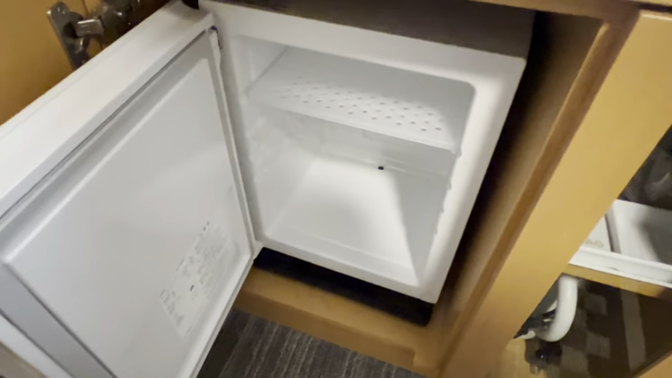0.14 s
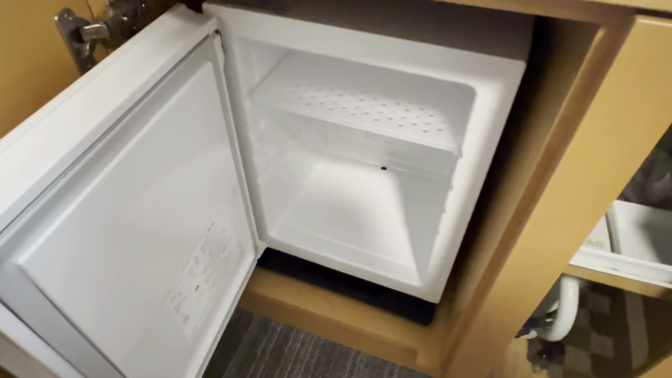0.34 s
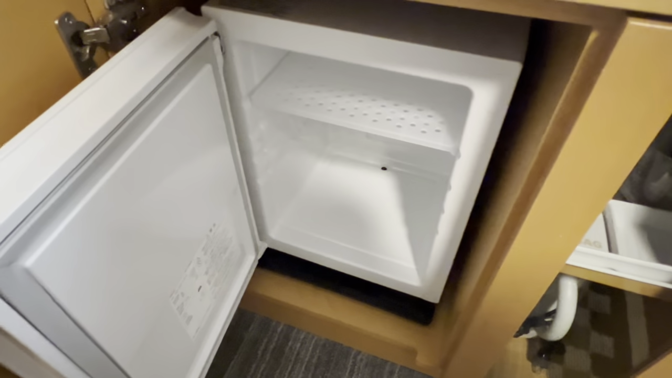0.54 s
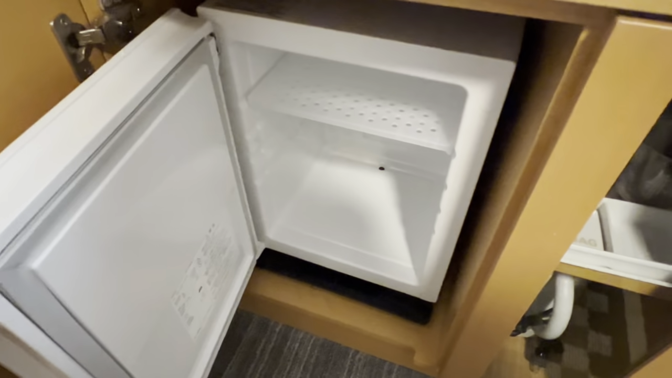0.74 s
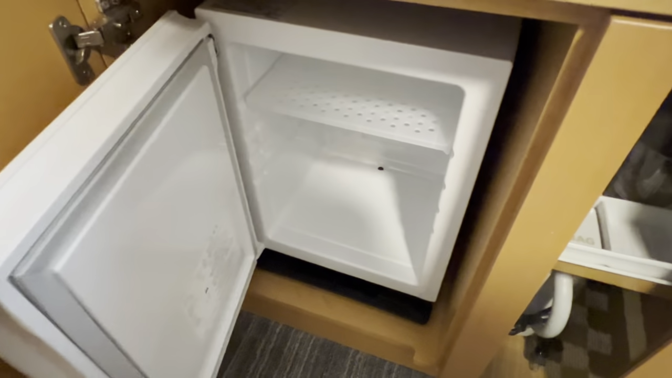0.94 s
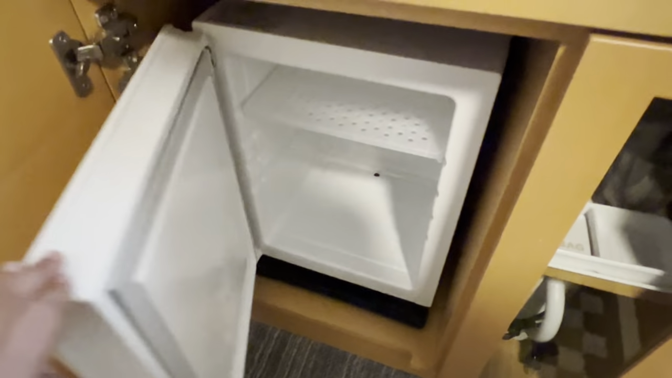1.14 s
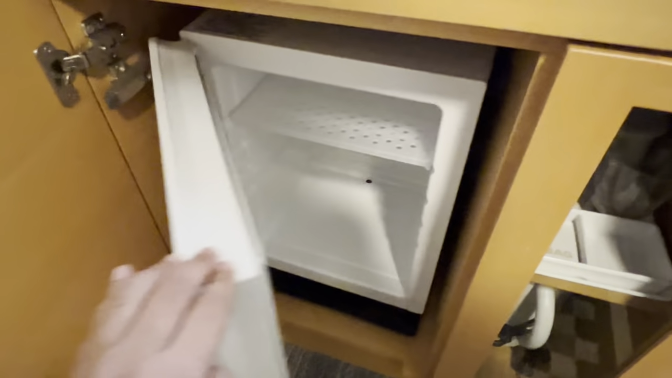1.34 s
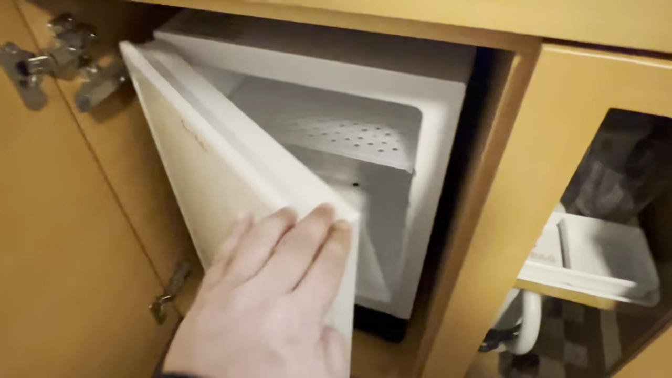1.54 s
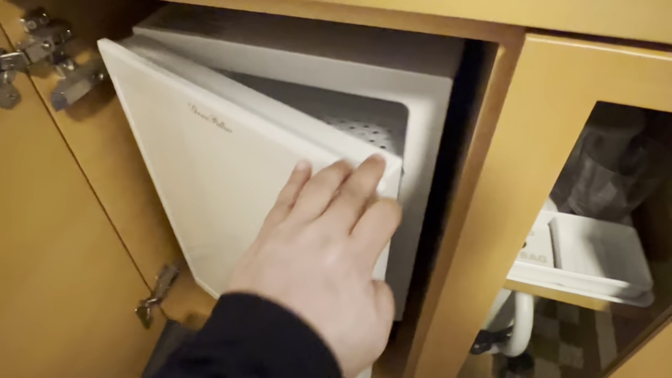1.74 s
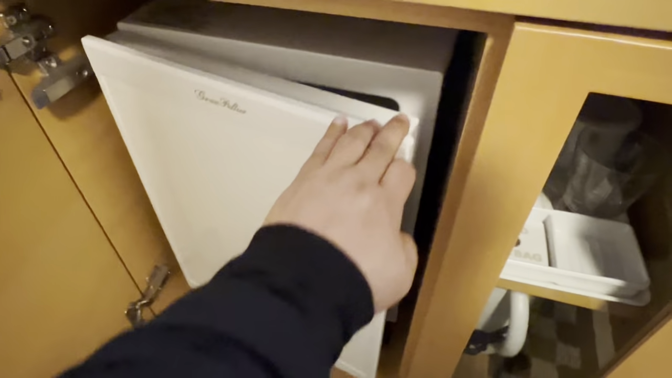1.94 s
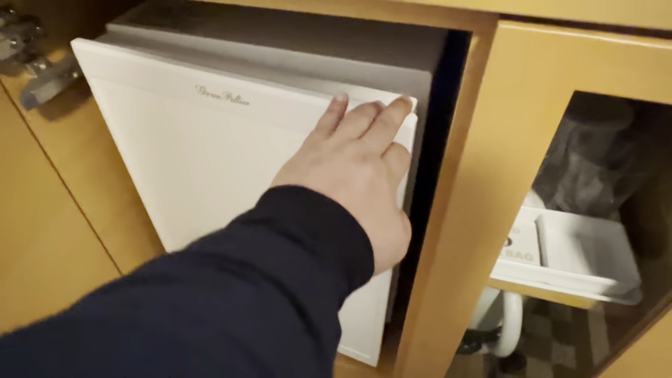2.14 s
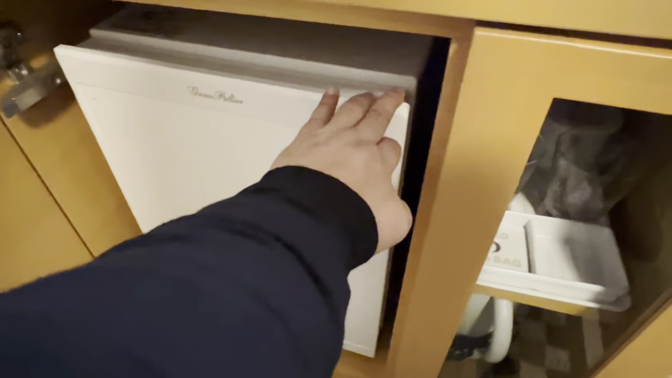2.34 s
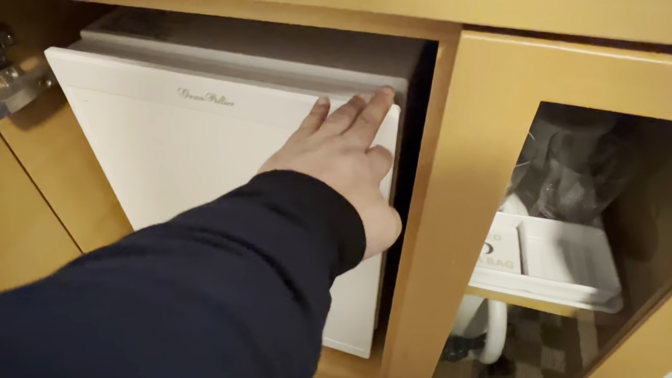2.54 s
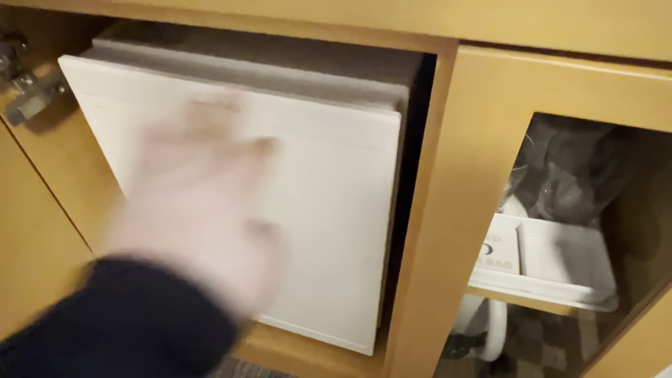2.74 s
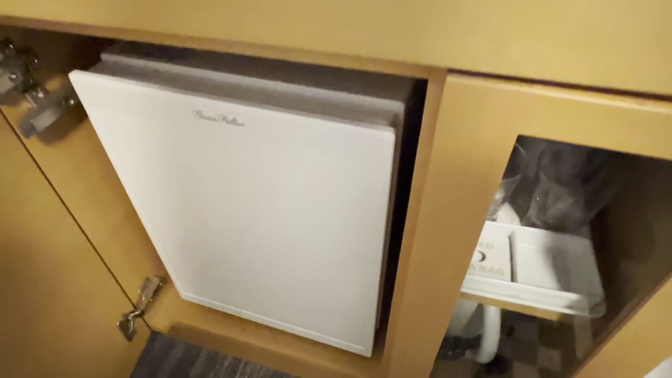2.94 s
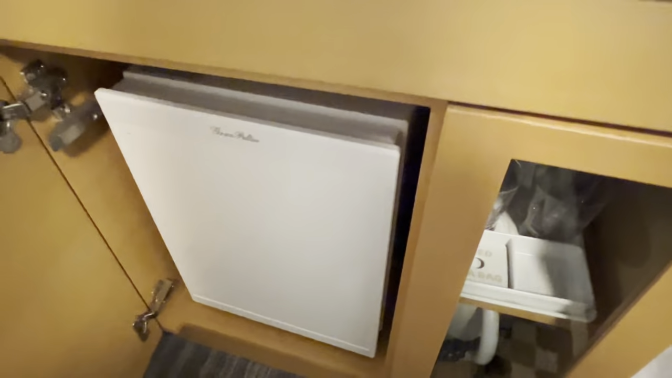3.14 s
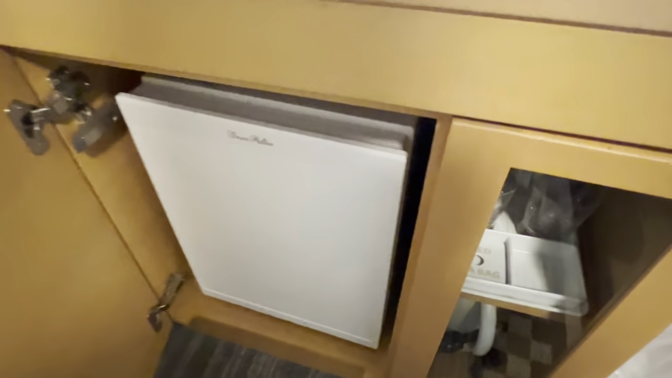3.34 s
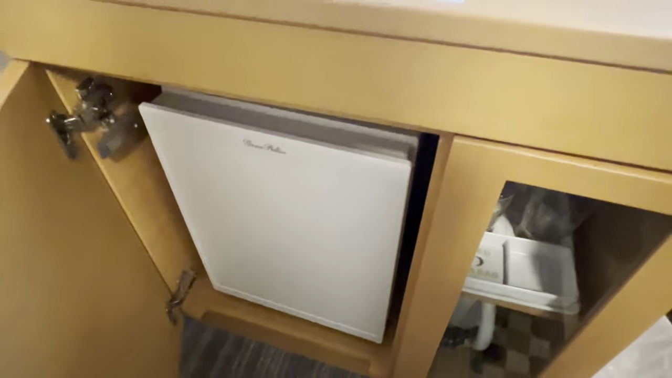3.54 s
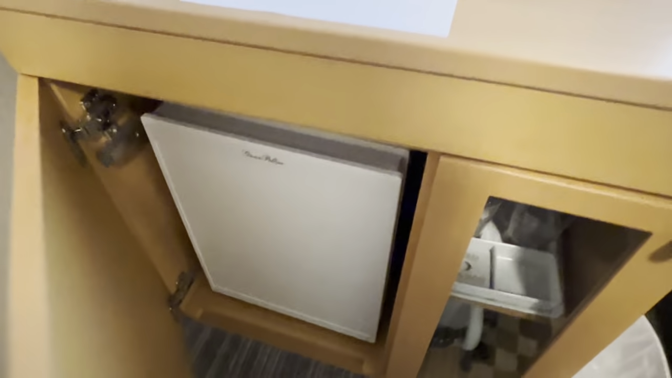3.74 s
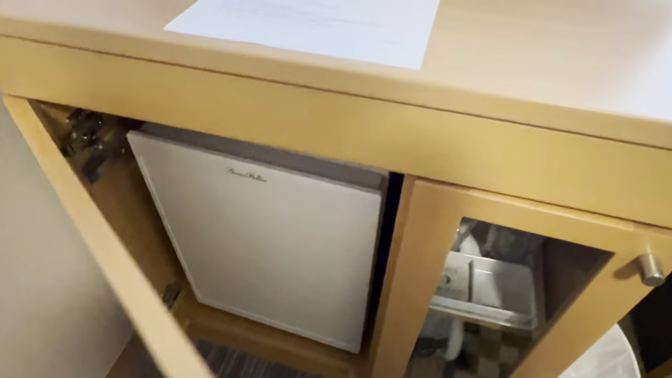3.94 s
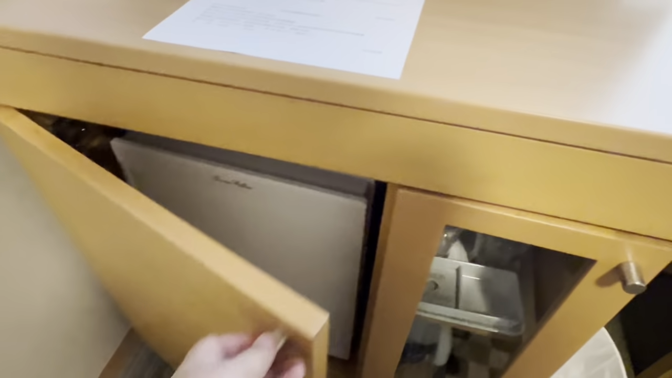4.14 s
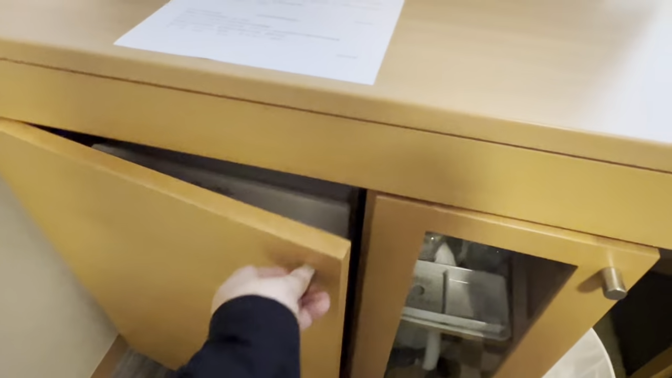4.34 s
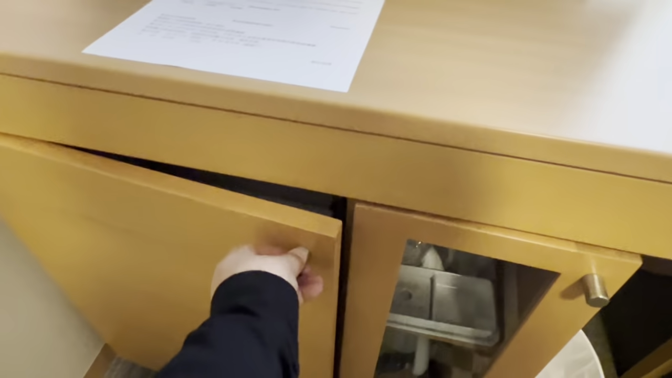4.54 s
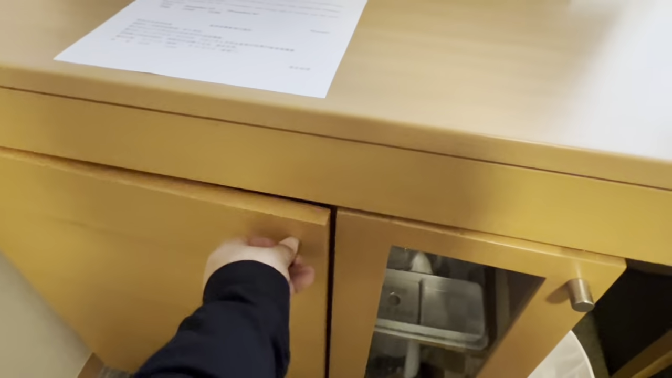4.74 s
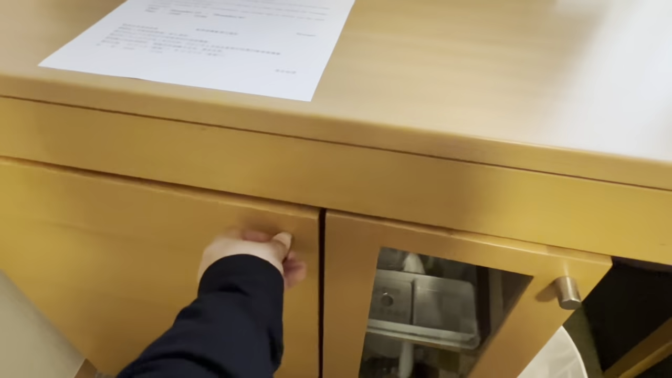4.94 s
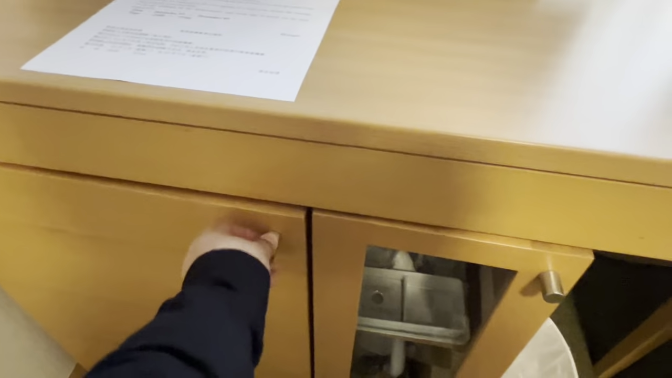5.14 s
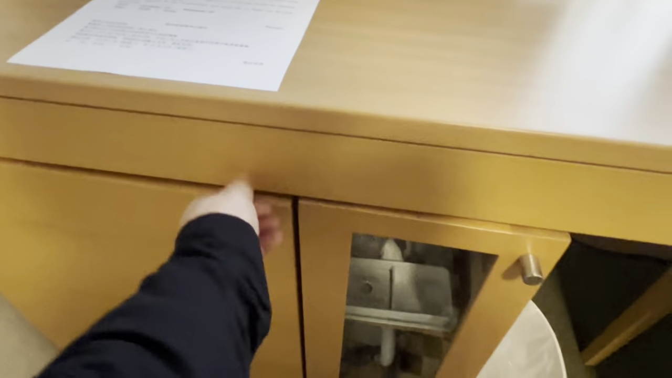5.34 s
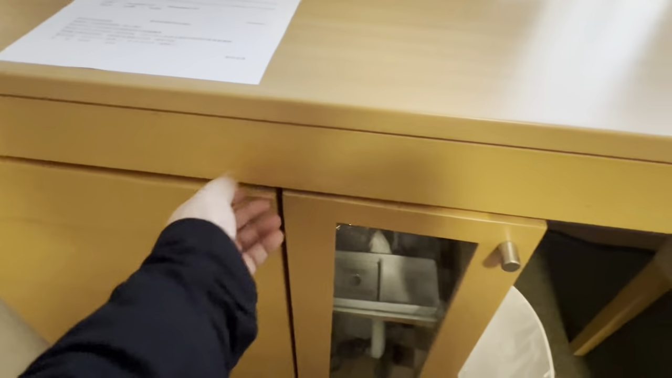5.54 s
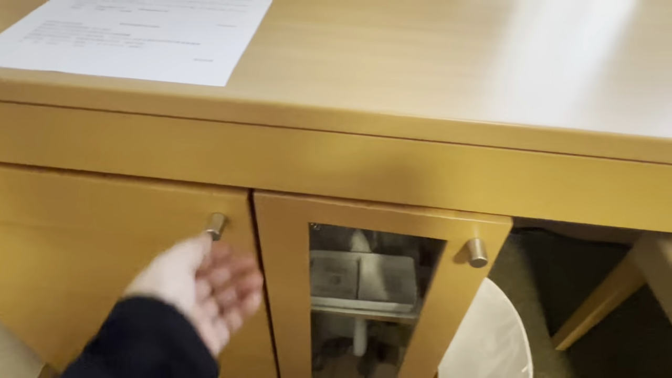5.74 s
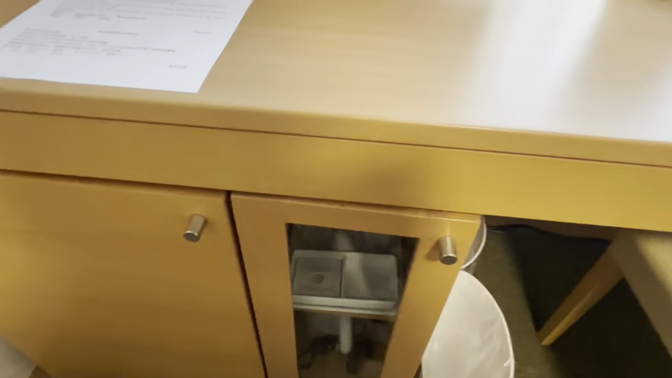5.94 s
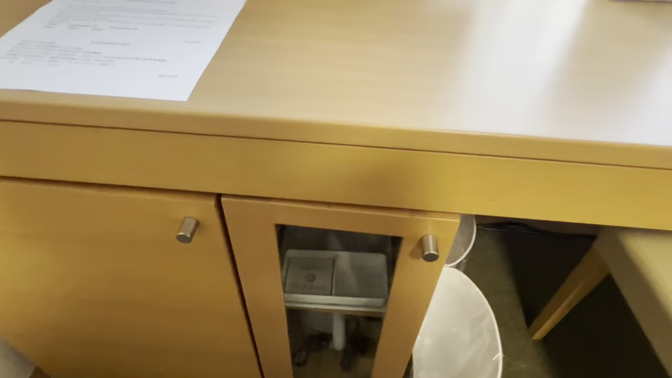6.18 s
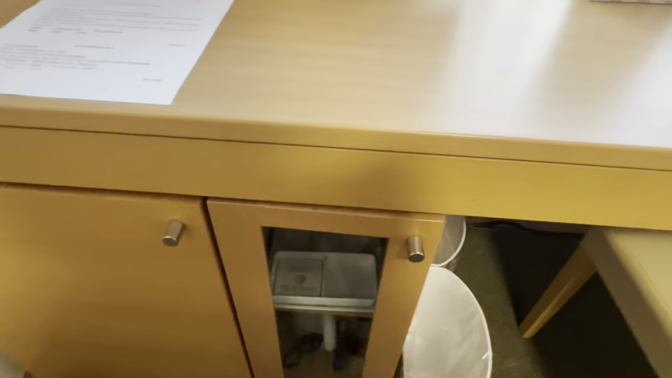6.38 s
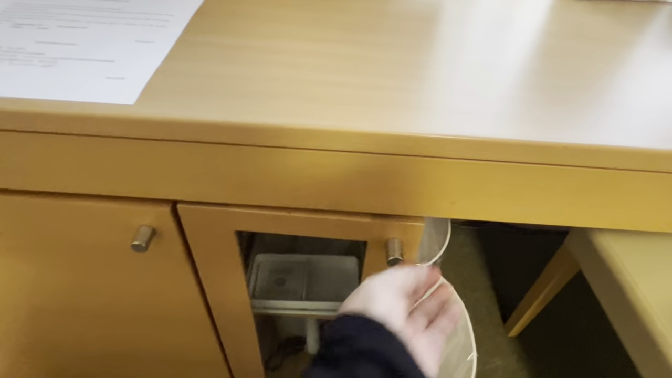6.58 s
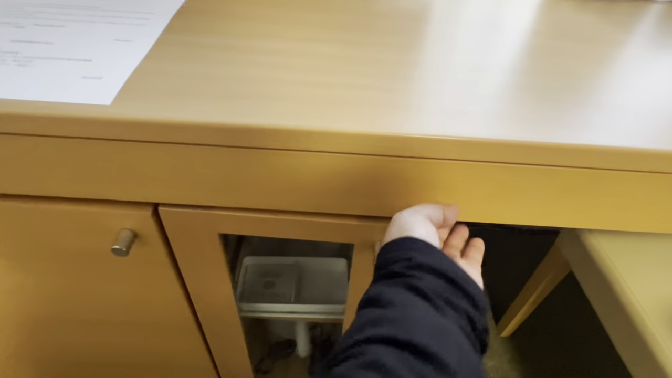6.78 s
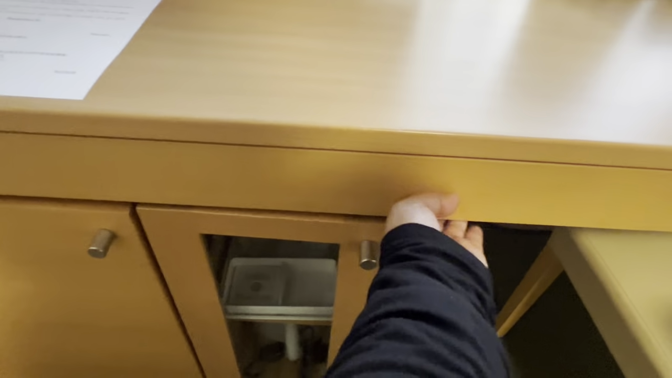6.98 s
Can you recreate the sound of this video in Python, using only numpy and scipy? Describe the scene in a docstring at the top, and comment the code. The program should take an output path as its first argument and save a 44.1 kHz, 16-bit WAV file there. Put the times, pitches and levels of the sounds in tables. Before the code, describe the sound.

Faint ventilation rumbles steadily in a small room. At about 2.3 seconds a small fridge door shuts close by with a slap of its rubber seal and a loud, low thud, followed by a tiny plastic tick at 2.7. A hand knocks lightly on a wooden cabinet door at 3.1, and a jacket sleeve rustles softly until just past 4 seconds. The hinges give brief, quiet squeaks and clicks around 3.6 to 4. Another light, hollow knock comes at 4.2, then the hinge spring snaps with a small metallic ring at 4.4. At about 4.9 the door claps shut against its frame, sharp and loud, with a short wooden boom. Faint scuffs follow around 5.3, with a little more sleeve rustle. At 6.7 a hand bumps the next door with a soft, dull thump, and the hum continues to the end at about 7 seconds.

```python
"""Shutting a fridge and its cabinet

A small fridge inside a wooden cabinet is pushed shut: its rubber seal slaps and the box booms.
The cabinet door swings round on squeaky sprung hinges and claps against the frame, so the wood rings;
a hand then bumps the next door. A jacket sleeve rustles close by as its folds rub together,
and ventilation hums in the small carpeted room."""
import sys
import numpy as np
from scipy import signal
from scipy.fft import rfft, irfft, next_fast_len
from scipy.io import wavfile

SR = 44100
rng = np.random.default_rng(int(sys.argv[2]) if len(sys.argv) > 2 else 0)


def store_wav(level_fs):
    """Save 16-bit WAV to argv[1]."""
    pcm = np.round(np.clip(np.atleast_2d(level_fs), -1, 1) * 32767)
    wavfile.write(sys.argv[1], SR, pcm.T.astype(np.int16))


N = 309141
TIME = np.arange(N) / SR
RING_TIME = TIME[:SR]  # one second for a struck thing to ring out

# how long sounds ring in the room, until 60 dB quieter: (frequency [Hz], ring time [s])
ROOM_DECAY = [(100, 0.69), (300, 0.25), (1000, 0.25), (5000, .27), (9000, 0.31), (15000, 0.19)]


def from_db(db):
    """Turn decibels into a number to multiply by."""
    return 10 ** (np.asarray(db) / 20)


def rms_one(x):
    """Scale a signal so that its average size (rms) is 1."""
    return x / np.sqrt(np.mean(x ** 2) + 1e-20)


def at_hz(points, hz):
    """Look up a frequency in a table, with octaves evenly spaced."""
    f, value = np.transpose(points)
    return np.interp(np.log(hz + 0.0011), np.log(f), value)


def drift(rate):
    """A random wobble of size 1 that heads for a new value `rate` times a second."""
    knots = rng.standard_normal(int(N / SR * rate) + 2)
    return rms_one(np.interp(TIME * rate, np.arange(len(knots)), knots))


def stereo_spectrum(colour, likeness, size, uneven_db, spacing_hz):
    """Left and right noise spectra shaped by `colour`; resonances and echoes make them uneven."""
    hz = np.fft.rfftfreq(size, 1 / SR)
    mid, side = rfft(rng.standard_normal((2, size)))
    heights = rng.standard_normal(4096)
    ripple_db = uneven_db * np.interp(hz / spacing_hz, np.arange(len(heights)), heights) * hz / (hz + 500)
    alike = np.clip(at_hz(likeness, hz), -.98, .98)
    bass_cut = 1 / np.sqrt(1 + (colour[0][0] / (hz + 1)) ** 6)
    gain = bass_cut * from_db(at_hz(colour, hz) + ripple_db)
    return hz, gain * (np.sqrt(1 + alike) * mid + np.sqrt(1 - alike) * side * [[1], [-1]])


def noise(colour, uneven_db, spacing_hz, size, lag=0):
    """Steady stereo noise of rms 1; the right side hears it `lag` seconds later."""
    # how alike air and rustle are on the left and right: (frequency [Hz], likeness [-1..1])
    likeness = [(60, 0.29), (130, 0.1), (290, 0.4), (700, 0.27), (3000, 0.011)]
    padded_size = 2 * next_fast_len(size // 2 + 1)
    hz, spectrum = stereo_spectrum(colour, likeness, padded_size, uneven_db, spacing_hz)
    delay = np.exp(-2j * np.pi * hz * np.array([[0], [lag]]))
    return rms_one(irfft(spectrum * delay)[:, :size])


def die_away(t, ring_s):
    """A fade that drops 60 dB in ring_s seconds."""
    return np.exp(-np.log(1000) * t / ring_s)


def dense_ring(colour, build_cycles, direct=0, direct_s=0.013):
    """Countless tones and echoes: each band builds up, low ones last, and dies at its own rate."""
    # how alike the ringing is on the left and right: (frequency [Hz], likeness [-1..1])
    likeness = [(60, 0.86), (130, 0.64), (290, 0.7), (640, 0.13), (1410, 0.5), (3100, -0.16),
                (15000, 0.065)]
    hz, spectrum = stereo_spectrum(colour, likeness, SR, uneven_db=1.5, spacing_hz=26)
    spectrum = spectrum / np.std(irfft(spectrum))
    edges = 2 ** np.arange(5, 15, .5)  # half-octave bands
    out = 0
    for low, high in zip(edges, edges[1:]):
        centre = np.sqrt(low * high)
        band = irfft(spectrum * ((hz >= low) & (hz < high)))
        build_up = 1 - np.exp(-RING_TIME * centre / build_cycles)
        out = out + band * build_up * die_away(RING_TIME, at_hz(ROOM_DECAY, centre))
    # the direct sound stands out before the room answers
    return out * (1 + direct * np.exp(-RING_TIME / direct_s))


def tone_ring(tones, lag=0):
    """A struck thing's fading tones, every other one flipped; the right side is `lag` seconds late."""
    t = np.maximum(RING_TIME - np.array([[0], [lag]]), 0)
    return sum((-1) ** k * from_db(db) * np.sin(2 * np.pi * hz * t) * die_away(t, ring_s)
               for k, (hz, db, ring_s) in enumerate(tones))


def add(out, s, sound):
    """Mix a sound in at s seconds."""
    start = round(s * SR)
    out[:, start:start + sound.shape[1]] += sound[:, :N - start]


def taps(rows, ring):
    """Each sharp tap starts the same ring at its own strength."""
    out = np.zeros((2, N))
    for s, db in rows:
        add(out, s, from_db(db) * ring)
    return out


def blows(rows, ring):
    """A soft contact sounds dull, and a long one feeds the ring gradually."""
    out = np.zeros((2, N))
    for s, db, bright_hz, contact_s in rows:
        dull = signal.butter(2, min(bright_hz, .45 * SR), fs=SR, output="sos")
        add(out, s, from_db(db) * signal.sosfilt(dull, ring) * (1 - np.exp(-RING_TIME / contact_s)))
    return out


def ventilation():
    """Rumbling air with faint wavering fan tones; both reach the left microphone first."""
    # rumble of the air: (frequency [Hz], relative level [dB])
    air_colour = [(15, -31), (25, -18), (56, 2), (243, -16), (309, -15.5), (462, -27.5), (573, -30),
                  (691, -28), (903, -39.5), (1910, -39.5), (2430, -44.5), (3260, -44.5), (7000, -48.5),
                  (15000, -65)]
    # fan tones that grow or fade as the microphone moves: (pitch [Hz], start level [dB], change [dB/s])
    fan_tones = [(314.5, -76.5, -0.98), (533, -81.5, -3.5), (684, -82.5, -1.5), (726, -85.5, 0.92)]
    # slow rise and fall of air and fan together: (time [s], gain [dB])
    swell = [(0, 0.28), (4.6, 1.5), (5.7, -2.5), (7, -1.5)]
    lag_s = 0.00037
    air = from_db(-58.5) * noise(air_colour, uneven_db=4.0, spacing_hz=42.1, size=N, lag=lag_s)
    for hz, db, db_per_s in fan_tones:
        turns = np.cumsum(hz + 3.0 * drift(30)) / SR - hz * np.array([[0], [lag_s]])
        level = from_db(db + db_per_s * TIME + 1.03 * drift(0.85))
        air = air + np.sqrt(2) * level * np.sin(2 * np.pi * turns)
    return from_db(np.interp(TIME, *np.transpose(swell))) * air


def sleeve():
    """Each rustle swells with the arm's speed; other folds rub each time, so no two sound alike."""
    # rubbing of sleeve and hand: (frequency [Hz], relative level [dB])
    rub_colour = [(700, 1), (1200, -5.5), (1600, 1), (2000, -4), (2550, -3), (3100, -8), (3600, -5),
                  (4400, -8.5), (6500, -10.5), (8000, -21), (12000, -44)]
    # fine hiss of the cloth: (frequency [Hz], relative level [dB])
    hiss_colour = [(4000, -13), (5100, -4.5), (6400, 6), (7500, -12), (8200, 5.5), (9600, 2.5), (10800, -5),
                   (13000, 0), (16000, -12.5)]
    # arm strokes: (time of top speed [s], rub [dB], hiss [dB], hiss tilt [dB/octave], rise [s], fall [s])
    strokes = [(1.85, -86.5, -90, -5, 0.49, 0.59), (2.92, -80, -83, 1, 0.24, 0.31),
               (3.13, -71.5, -85, 0, 0.014, 0.062), (3.29, -70, -77.5, 5, 0.074, 0.1),
               (3.531, -64.5, -67.5, -11, 0.093, 0.084), (3.63, -63, -67.5, -1, 0.068, 0.075),
               (3.804, -70, -73.5, 18, 0.032, 0.021), (3.883, -67, -68, 10, 0.02, 0.031),
               (3.999, -66.5, -75.5, 13, 0.055, 0.048), (4.15, -74.5, -83.5, 7, 0.17, 0.18),
               (5.28, -76.5, -89, 5, 0.12, 0.19), (6.059, -79, -85, -2, 0.33, 0.17),
               (6.46, -79.5, -81.5, 1, 0.11, 0.2), (6.76, -78, -80, 14, 0.084, 0.15),
               (6.93, -77, -81.5, 6.5, 0.032, 0.1)]
    half = 2 * SR // 3
    out, t = np.zeros((2, N)), np.arange(-half, half) / SR
    for s, rub_db, hiss_db, tilt_db, rise, fall in strokes:
        speed = np.exp(-.5 * (t / np.where(t < 0, rise, fall)) ** 2)
        weave = [(hz, db + tilt_db * np.log2(hz)) for hz, db in hiss_colour]
        rub = from_db(rub_db) * noise(rub_colour, uneven_db=3.5, spacing_hz=93.5, size=len(t))
        hiss = from_db(hiss_db) * noise(weave, uneven_db=3.5, spacing_hz=202.5, size=len(t))
        add(out, s + t[0], speed * (rub + hiss))
    flutter_db, grain_db = 0.73, 0.75  # the cloth catches unevenly
    return out * from_db(flutter_db * drift(100) + grain_db * drift(650))


def scrapes():
    """A run of tiny slips swells and fades, ringing at one pitch."""
    # creaks of hinge and knob, scuffs of hand and sleeve:
    # (time [s], level [dB], half length [s], pitch [Hz], sharpness [Q])
    scuffs = [(1.86, -79, 0.012, 1900, 6), (3.131, -65, 0.0068, 2920, 3.9), (3.312, -68.5, 0.067, 3340, 6),
              (3.62, -63, 0.018, 986, 28), (3.626, -63, 0.033, 2750, 7), (3.573, -70, 0.043, 4850, 7),
              (4.03, -73, 0.13, 2470, 20), (4.176, -72.5, 0.02, 2580, 22), (5.307, -66, 0.0036, 2280, 5.1),
              (5.324, -63, .004, 2350, 3.6), (5.365, -72, 0.011, 2350, 4.3), (6.086, -75, 0.071, 1720, 5.9),
              (6.74, -77, 0.038, 4450, 8), (6.998, -71, .01, 3850, 7)]
    out = 0
    slips = rng.standard_normal((2, N)) * from_db(2.0 * drift(300))
    for s, db, half_s, hz, sharpness in scuffs:
        ring = signal.lfilter(*signal.iirpeak(hz, sharpness, fs=SR), slips)
        out = out + from_db(db) * rms_one(ring) * np.exp(-np.abs(TIME - s) / half_s / 2)
    return out


def squeaks():
    """The hinge sticks and slips so fast that it sings brief notes, which linger in the room."""
    # hinge notes: (time [s], level [dB], half length [s], pitch [Hz], glide [Hz/s])
    notes = [(3.587, -63, 0.0083, 1016, 0), (3.61, -50, 0.0048, 724, 2600), (3.72, -61, 0.0042, 1024, 0)]
    out, t = np.zeros((2, N)), RING_TIME - .5
    room = dense_ring([(400, 0), (1500, 0), (3000, -30)], build_cycles=2.0)
    room = from_db(-10.5) * room / np.sqrt(np.sum(room ** 2) / 2)
    for s, db, half_s, hz, glide in notes:
        swell = from_db(db) * np.exp(-.5 * (t / half_s) ** 2)
        note = swell * np.sin(2 * np.pi * (hz + .5 * glide * t) * t)
        echo = signal.fftconvolve(room, note[None], axes=1)[:, :SR]
        add(out, s - .5, note + echo)
    return out


def fridge():
    """The rubber seal slaps and settles, the box booms, and the plastic door ticks."""
    # the seal meets the fridge: (time [s], level [dB], brightness [Hz], contact time [s])
    seal_hits = [(2.332, -51, 10200, 0.0047), (2.339, -45.5, 4240, 0.0019), (2.354, -41, 730, 0.0042),
                 (2.385, -57.5, 11800, 0.0012), (2.408, -43.5, 540, 0.001)]
    # slap of the seal: (frequency [Hz], relative level [dB])
    seal_colour = [(100, 8), (200, -3), (320, 1.5), (500, -11.5), (750, -6), (1050, -13), (1400, -9.5),
                   (2000, -9), (3000, -18.5), (4200, -16.5), (6000, -25.5), (9000, -27), (13000, -24),
                   (16000, -23)]
    # the box takes the weight of its door: (time [s], strength [dB])
    thumps = [(2.343, 0.1)]
    # tones of the box: (pitch [Hz], level [dB], ring time [s])
    box_tones = [(48.9, -20.5, 0.41), (51, -15, 0.061), (67.1, -25.5, 0.38), (83.4, -23, 0.33),
                 (128.7, -41.5, 0.42), (220, -44, 0.1), (253.8, -52.5, 0.48), (367, -56, 0.72)]
    # ticks of the door: (time [s], strength [dB])
    ticks = [(2.3371, -13.5), (2.6893, -2.5)]
    # tones of the plastic: (pitch [Hz], level [dB], ring time [s])
    tick_tones = [(3630, -45.5, 0.0041), (6800, -51, 0.002), (12000, -37.5, 0.0069), (14300, -32.5, 0.0019)]
    slap = blows(seal_hits, dense_ring(seal_colour, build_cycles=0.64, direct=1.9, direct_s=0.0061))
    boom = taps(thumps, tone_ring(box_tones, lag=0.00032))
    echo_colour = [(2500, -11), (6500, -9), (9500, -9), (13000, -15), (16000, -13)]
    tick_echo = from_db(-64.5) * dense_ring(echo_colour, build_cycles=5.8)
    return slap + boom + taps(ticks, tone_ring(tick_tones, lag=.00001) + tick_echo)


def hinges():
    """The metal hinge and knob click, and the spring rings as it snaps over to pull the door in."""
    # metal clicks: (time [s], level [dB], brightness [Hz], contact time [s])
    clicks = [(3.713, -63, 4500, 0.0026), (3.789, -66, 7400, 0.0033), (4.04, -59.5, 5100, 0.01),
              (4.365, -64, 4600, 0.0017), (4.7725, -72.5, 7800, 0.00057), (6.68, -68, 8000, .007)]
    # ring of the metal: (frequency [Hz], relative level [dB])
    metal_colour = [(700, 7.5), (1500, -3), (2100, 0), (2900, -3.5), (4000, -3), (5500, -14), (7000, -15),
                    (14000, -32.5)]
    # the spring snaps over: (time [s], strength [dB])
    spring_snaps = [(4.3665, 2.5)]
    # tones of the spring: (pitch [Hz], level [dB], ring time [s])
    spring_tones = [(1415, -53, .13), (1725, -53, .1), (2044, -55.5, .09), (2780, -66, 0.076)]
    metal = blows(clicks, dense_ring(metal_colour, build_cycles=0.71, direct=5.8, direct_s=0.0036))
    return metal + taps(spring_snaps, tone_ring(spring_tones, lag=0.000405))


def hand_knocks():
    """A hand knocks hollowly on the open door as it takes and pushes it, then bumps the next door."""
    # grab and push: (time [s], strength [dB], brightness [Hz], contact time [s])
    grabs = [(3.122, 4, 900, 0.019), (4.176, 3, 610, 0.016)]
    # tones of the open door: (pitch [Hz], level [dB], ring time [s])
    open_door_tones = [(125.7, -50, 0.36), (257, -46.5, 0.18), (328, -34, 0.025), (360.4, -38.5, 0.091),
                       (464, -51.5, .12), (684, -48, 0.13)]
    # bump on the next door: (time [s], strength [dB])
    bumps = [(6.6854, -2.5)]
    # tones of that door: (pitch [Hz], level [dB], ring time [s])
    next_door_tones = [(76.6, -34.5, 0.32), (100, -33, 0.18), (135, -38, 0.17), (224.5, -55.5, 0.33)]
    return blows(grabs, tone_ring(open_door_tones, lag=0.0005)) + taps(bumps, tone_ring(next_door_tones))


def panel_ring():
    """A wooden door panel rings: a few clear tones stand out from countless weak ones."""
    # clear tones: (pitch [Hz], level [dB], left-right likeness [-1..1])
    clear_tones = [(321, -9, .9), (347, -8.5, .7), (365, -9, .9), (390, -5, .9), (417, -8.5, .6),
                   (479, -10.5, .9), (581, -10, -.5), (604, -11.5, -.6), (837, -6.5, .7), (951, -4.5, .8),
                   (978, -8, -.4), (1071, -9.5, -.7), (1132, -11, -.1), (1176, -10, -.3),
                   (1278, -4.5, -.95), (1321, -10, -.6), (1431, -10, -.2), (1510, -7, -.4),
                   (1599, -10.5, .6), (1624, -7.5, -.9), (1675, -10, -.3), (1985, -13, -.2),
                   (2089, -9.5, .95), (2274, -15, .3), (2591, -13.5, .8), (2762, -12, -.5),
                   (3020, -15, -.8)]
    # blur of weak tones: (frequency [Hz], relative level [dB])
    wood_colour = [(130, 0), (200, 1.5), (370, 1.5), (520, -4.5), (700, 0.5), (1100, -3.5), (1500, 0),
                   (2000, -7.5), (2700, -6.5), (3400, -15.5), (5000, -26), (7000, -38), (9500, -48),
                   (15000, -58.5)]
    clear = 0
    for k, (hz, db, alike) in enumerate(clear_tones):
        phase = 2 * np.pi * hz * RING_TIME
        mid = np.sqrt((1 + alike) / 2) * np.sin(phase)
        side = np.sqrt((1 - alike) / 2) * np.cos(phase) * [[1], [-1]]
        fade = die_away(RING_TIME, at_hz(ROOM_DECAY, hz))
        clear = clear + (-1) ** k * from_db(db) * (mid + side) * fade
    blur = from_db(0.5) * dense_ring(wood_colour, build_cycles=2.4, direct=1.0)
    return blur + clear * (1 - np.exp(-RING_TIME / 0.0012))


def door_claps():
    """The door's edge lands at several points in turn, so each clap is a quick uneven run of snaps."""
    # the edge claps and chatters on the frame: (time [s], strength [dB])
    claps = [(4.8688, -3), (4.8795, -12), (4.915, -24)]
    # tones of the edge: (pitch [Hz], level [dB], ring time [s])
    edge_tones = [(974, -22.5, 0.0075), (1340, -15.5, 0.014), (1640, -27.5, 0.018), (2000, -20.5, 0.021),
                  (2610, -23, 0.012), (3570, -33, 0.018)]
    count, gap_s, spread_db, growth_db = 4, .0013, 3, 2.5  # snaps grow as the edge settles
    snaps = [(s + gap_s * (k + rng.uniform(-0.22, 0.16)),
              db - growth_db * (count - 1 - k) + spread_db * rng.standard_normal())
             for s, db in claps for k in range(count)]
    out = taps(snaps, tone_ring(edge_tones, lag=0.00038))
    soften = signal.butter(2, 4500, fs=SR, output="sos")  # the wood gives a little
    return signal.sosfilt(soften, out + 1e-18)


def cabinet():
    """Knocks ring the door panel, shoves make the cabinet boom, and the door claps shut."""
    # knocks on the doors: (time [s], level [dB], brightness [Hz], contact time [s])
    knocks = [(4.162, -61, 3220, 0.0069), (4.364, -58, 3840, 0.0012), (4.374, -49.5, 630, 0.0044),
              (4.8695, -29, 8960, 0.0009), (6.679, -54.5, 239, 0.0042)]
    # shoves on the cabinet: (time [s], strength [dB])
    shoves = [(3.15, -20), (4.192, -16.5), (4.229, -22.5), (4.39, -21.5), (4.8715, 0), (5.3, -28),
              (5.38, -29.5)]
    # low tones of its body: (pitch [Hz], level [dB], ring time [s])
    body_tones = [(54.4, -46.5, 0.4), (82.96, -25, 0.4), (95.7, -24, 0.16), (121, -31, 0.3),
                  (160, -36, 0.39)]
    boom = taps(shoves, tone_ring(body_tones, lag=0.00037))
    return blows(knocks, panel_ring()) + boom + door_claps()


def scene():
    """The doors, the moving arm and the room's air, mixed together."""
    doors = fridge() + hinges() + hand_knocks() + cabinet()
    return doors + scrapes() + squeaks() + sleeve() + ventilation()


def record(dry):
    """Cut off the highest treble steeply."""
    cutoff_hz = 15900
    return signal.sosfilt(signal.ellip(10, .1, 80, cutoff_hz, fs=SR, output="sos"), dry)


dry = scene()
out = record(dry)
store_wav(out)
```